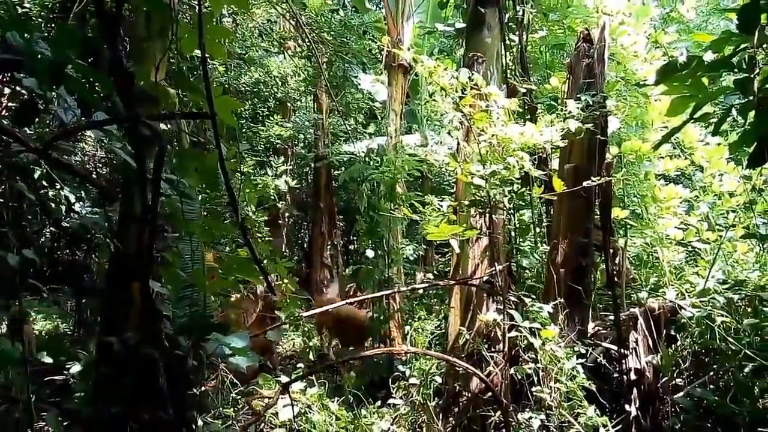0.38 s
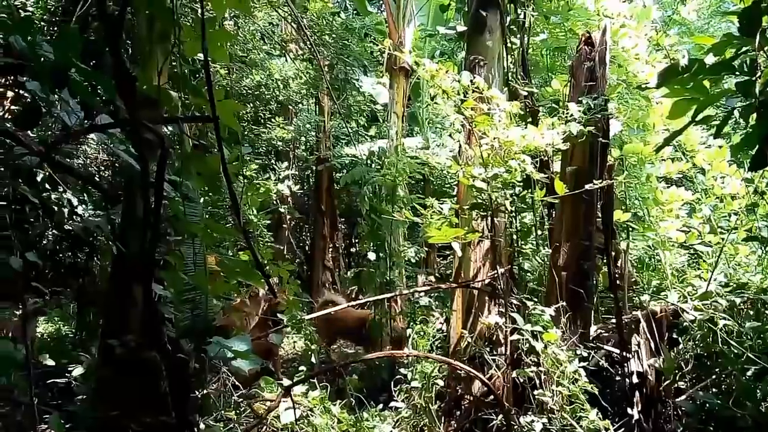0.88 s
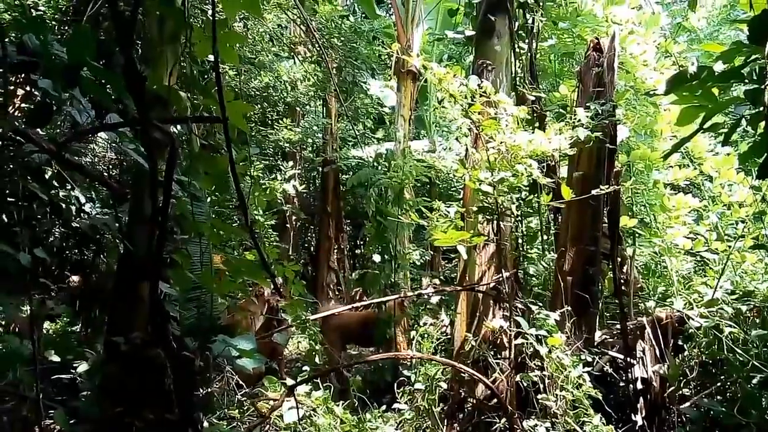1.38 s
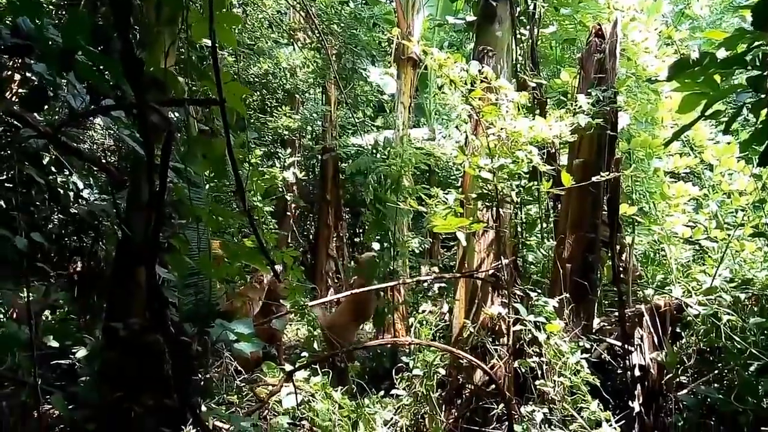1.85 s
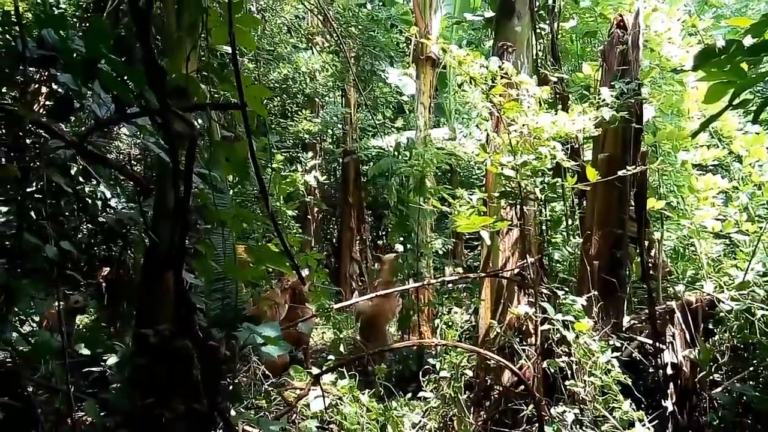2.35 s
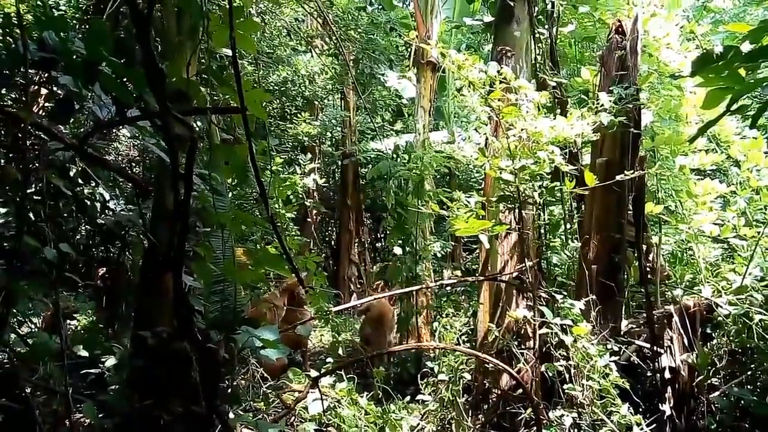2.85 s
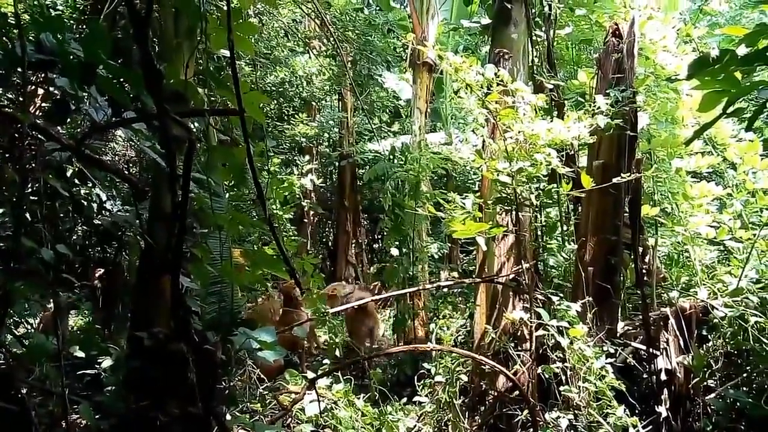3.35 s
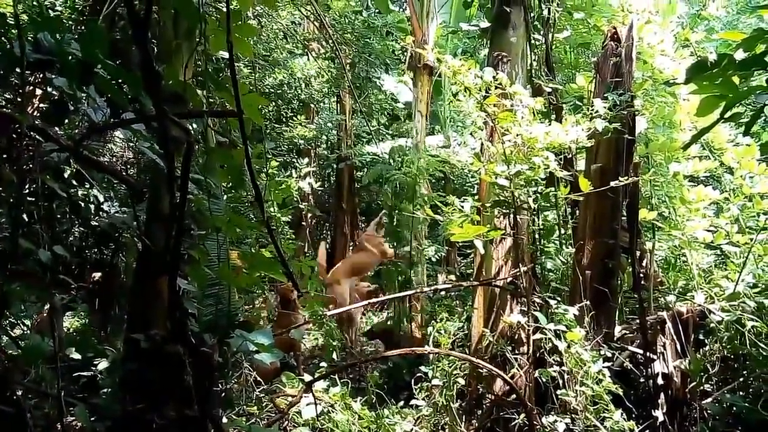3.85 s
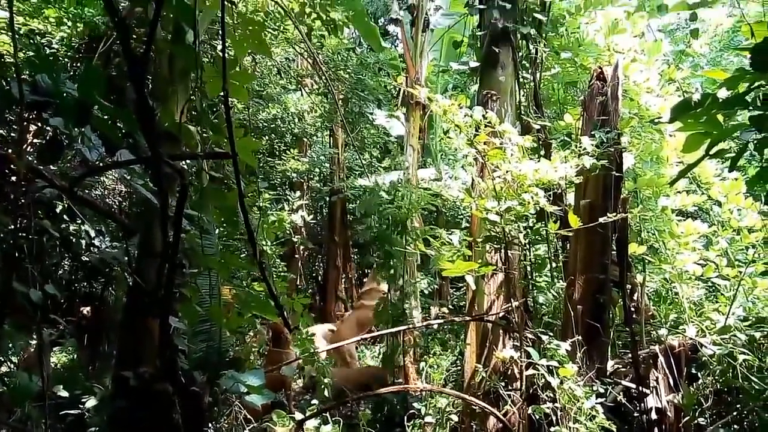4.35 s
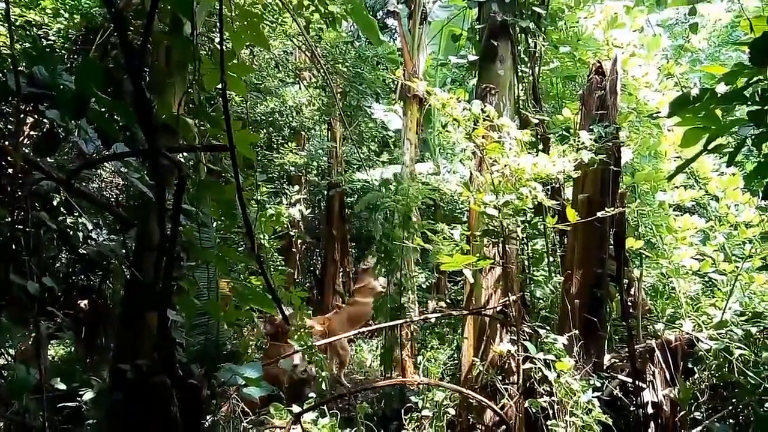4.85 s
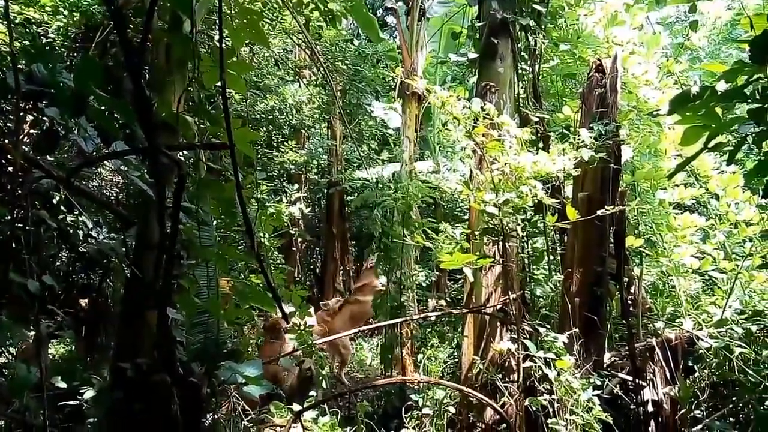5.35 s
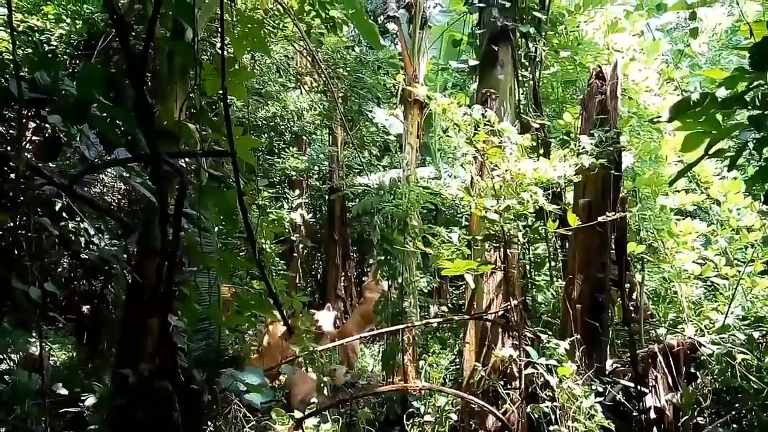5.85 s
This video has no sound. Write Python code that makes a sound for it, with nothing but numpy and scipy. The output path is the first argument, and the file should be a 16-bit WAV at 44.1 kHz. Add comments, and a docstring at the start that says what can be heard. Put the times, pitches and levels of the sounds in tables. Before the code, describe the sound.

Dogs in dense forest, some metres from a small, faintly hissing microphone, over soft leaf air and low distant traffic. From 0 to 1 s, rapid uneven panting, with the strongest puffs in the first quarter second. A small rising yip comes at 1.1, then quick yaps at 1.7 and 2.1. At 2.3 a bright yip runs into a piercing, trembling whine until about 2.75, topped by a thin nasal whistle; a loud yelp breaks upward at 2.8. Soft whimpers, whistles and pants fill 3.0 to 3.7. Three yips tumble out from 3.8 to 4.25, the middle one loudest, followed by hoarse breathy grunts around 4.4. Strong yelps hit at 4.65 and 4.9, then whimpers and a lesser yap at 5.35. A barely audible far two-tone horn lasts from 5.1 to 5.9. A last yip and whine rise at 5.6 and sag past 6.0 as paws crackle dry leaves. Calls leave short, dense trunk echoes.

```python
"""Excited dogs yip, whine and pant at the foot of a tree in thick forest, some metres from a small microphone.
Voices are trembling partials with gated breath noise; pants and the air in the leaves are filtered noise.
A thin nasal whistle rides above the whines; trunks and leaves send back a short dense echo.
Far off: traffic rumble as low noise and a two-tone horn of sines; at the end paws crackle in dry leaves."""
import sys
import numpy as np
from scipy import signal
from scipy.fft import rfft, irfft, next_fast_len
from scipy.io import wavfile
from scipy.ndimage import uniform_filter1d, minimum_filter1d, map_coordinates

SR = 44100
rng = np.random.default_rng(int(sys.argv[2]) if len(sys.argv) > 2 else 0)


def voltage_ratio(level):
    """Linear amplitude factor for a level in decibels (scalar or array-like)."""
    return 10 ** (np.asarray(level, float) / 20)


def master(y):
    """Save y as 16-bit WAV."""
    cut = np.clip(np.atleast_2d(y).T, -1, 1)
    pcm = np.round(cut * 32767)  # scale
    wavfile.write(sys.argv[1], SR, pcm.astype(np.int16))


N = 273861

# pants: start_s, breath_db, fade_s, teeth_hiss_re_breath_db
PANTS = [(0.0, -49, 0.039, -14), (0.077, -34, 0.016, -26), (0.146, -46, 0.071, -34),
         (0.204, -33, 0.015, -26), (0.398, -44, 0.041, -17), (0.492, -41.5, 0.014, -32),
         (0.622, -49.5, 0.075, -19), (0.755, -44.5, 0.022, -36), (0.911, -56.5, 0.16, -20),
         (1.01, -42.5, 0.024, -14.5), (1.287, -44.5, 0.015, -10), (1.436, -52.5, 0.035, -24),
         (1.931, -37, 0.031, -20), (3.02, -37.5, 0.048, -24), (3.278, -38, 0.014, -8),
         (3.377, -53, 0.14, -11), (3.639, -39, 0.067, -22), (3.745, -45, 0.029, -26),
         (3.9225, -41, 0.035, -13), (4.359, -34.5, 0.044, -23), (4.506, -36.5, 0.054, -28.5),
         (5.104, -47.5, 0.076, -16), (5.481, -44.5, 0.025, -23)]
# open mouth resonances: centre_hz, width_hz, relative_db
MOUTH_RESONANCES = [(1050, 170, -9), (1820, 298, 0.5), (2097, 500, -1.5), (2625, 530, -8)]
# spectrum of air in the leaves: freq_hz, relative_db
AIR_SPECTRUM = [(150, -35), (250, -6), (324, -5), (592, -2.5), (900, -6), (1310, -8), (2000, 2),
                (3140, -12.5), (3930, -14.5), (4900, -10), (6000, -17.5), (7600, -28), (9000, -57.5)]
# spectrum of far traffic: freq_hz, relative_db
RUMBLE_SPECTRUM = [(20, -20), (45, -20), (75, -6), (100, -8.5), (148, -2.5), (200, -10.5), (300, -20.5),
                   (450, -50)]
# late echo of the trunks: freq_hz, t60_s
FOREST_DECAY = [(500, 0.9), (1000, 0.46), (2200, 0.43), (3500, 0.48), (6000, 0.053)]
# swelling yips, levels before the gesture: start_s, length_s, first_pitch_hz, mid_pitch_hz, level_db
YIPS = [(1.124, 0.087, 565, 1048, -32.5), (2.318, 0.14, 892, 1258, -19), (3.771, 0.0878, 798, 916.4, -19),
        (3.96, .115, 796, 1070, -14), (4.155, .115, 693, 947.6, -22.5), (5.58, .185, 779, 1197, -17)]
# yelps that hold a note, then break upward: start_s, length_s, first_pitch_hz, mid_pitch_hz, level_db
YELPS = [(2.79, .12, 910.4, 1188, -11), (4.87, .125, 964.7, 1217, -10.5)]
# abrupt yaps: start_s, length_s, first_pitch_hz, mid_pitch_hz, level_db
YAPS = [(1.706, 0.067, 1117, 1182, -25), (1.89, 0.087, 1128, 937, -42.5), (2.097, 0.089, 1010, 1097, -21.5),
        (4.644, 0.12, 877.4, 1212, -11.5), (5.357, 0.096, 897, 1058, -24.5)]
# overtone gain of the throat, jaws wide: freq_hz, gain_db
OPEN_THROAT = [(1100, -17), (1400, -18), (1750, 0.5), (2200, -2), (2650, -9), (3000, -18), (3600, -34),
               (4100, -62.5), (4700, -36.5), (5300, -35), (6000, -46.5), (7000, -72.5), (9000, -77)]
# overtone gain of the throat, jaws nearly shut: freq_hz, gain_db
NARROW_THROAT = [(1100, 9.5), (1500, -0.2), (2300, 3.5), (3000, -4), (3400, -19), (4100, -32), (4700, -7),
                 (6500, -30), (9000, -35.5)]
# nasal whistle, one table per call: time_s, pitch_hz, level_db
WHISTLES = [
    [(1.18, 5857, -46), (1.2, 4670, -52), (1.21, 4480, -41.5), (1.225, 5140, -42)],
    [(2.34, 5760, -60), (2.42, 6490, -44.5), (2.55, 6480, -57), (2.68, 6070, -60.5), (2.73, 5310, -40.0),
     (2.77, 5500, -83)],
    [(3.11, 5620, -59), (3.19, 5930, -46.5), (3.26, 5840, -52), (3.28, 5530, -45.5), (3.3, 5240, -43)],
    [(3.42, 5840, -63), (3.46, 5970, -56)],
    [(3.49, 6330, -52), (3.53, 5660, -53.5), (3.6, 5850, -50.5), (3.635, 5740, -55)],
    [(3.642, 5306, -30.5), (3.68, 5194, -46)],
    [(5.845, 5210, -46), (5.93, 5460, -63)],
]
# long whines, one table per call: time_s, pitch_hz, fundamental_db, mouth_opening_overtone_db
WHINES = [
    [(2.41, 1186, -37, 16), (2.43, 1362, -15, -19.5), (2.47, 1469, -14.5, -14.5), (2.54, 1565, -13, -25.5),
     (2.6, 1509, -9, -22.5), (2.63, 1524, -16, -6.5), (2.66, 1500, -11.5, -24.5), (2.695, 1412, -20, -30.5),
     (2.72, 1462, -40.5, -3), (2.77, 1410, -30, -27)],
    [(4.62, 754, -37, -3.5), (4.65, 707, -45.5, 25), (4.68, 811, -25.5, 7), (4.71, 826, -32.5, 7),
     (4.75, 727.4, -39, 13.5), (4.83, 714, -51, 18), (4.87, 608, -35.5, -38)],
    [(5.61, 796, -38.5, -17), (5.65, 856.6, -24.5, -11), (5.71, 904.7, -20.5, -5), (5.74, 985, -5.5, -32.5),
     (5.76, 1098, -10, -43.5), (5.82, 1098, -9.5, -16.5), (5.86, 1035, -10, -36), (5.9, 964, -10, -18),
     (5.94, 936, -25, -5.5), (6.0, 789.6, -29, -0.5), (6.04, 672, -44.5, 2), (6.12, 587, -44.5, 5),
     (6.21, 566.4, -42.5, 2)],
]
# soft whimpers: start_s, length_s, first_pitch_hz, mid_pitch_hz, level_db
WHIMPERS = [(2.56, 0.14, 770, 800, -51), (3.205, 0.07, 1370, 1410, -33), (3.38, 0.029, 1730, 1744, -46),
            (3.461, .052, 1408, 1473, -26), (5.08, 0.086, 757, 832, -39.5), (5.15, 0.084, 967, 927, -33)]
# hoarse grunts: start_s, length_s, first_pitch_hz, mid_pitch_hz, level_db
GRUNTS = [(3.0, 0.093, 690, 642, -44.5), (3.64, 0.022, 760, 742, -36.5), (4.345, 0.062, 680, 837, -41.5),
          (4.497, 0.072, 700, 846, -39.5)]
# far horn: pitch_hz, level_db
HORN = [(328, -63), (409, -62), (657, -70)]
# horn swell: time_s, gain_db
HORN_SWELL = [(5.07, -20), (5.13, 0), (5.5, 0), (5.75, -3), (5.9, -20)]
# paws shuffling in leaves: time_s, level_db
SHUFFLE = [(5.82, -65.5), (5.85, -46), (6.0, -39), (6.21, -41)]
# dry leaves snapping, onset before colouring: start_s, onset_db
SNAPS = [(5.8608, -24.5), (5.963, -43), (6.063, -41.5), (6.1499, -42)]
# spectrum of shuffled leaves: freq_hz, relative_db
LEAF_SPECTRUM = [(150, -66), (500, -0.5), (2500, 2), (3700, -15), (5000, -5), (6000, -22.5), (8000, -38),
                 (13000, -50)]
# colour of a snap: freq_hz, gain_db
SNAP_SPECTRUM = [(500, -8), (2500, -2.5), (5000, 6), (6500, -11), (8000, -8), (10000, -26), (14000, -25.5)]


def unit(x):
    """x at rms 1."""
    return x / np.sqrt(np.mean(x ** 2) + 1e-20)


def noise():
    """White noise of rms 1, scene length."""
    return rng.standard_normal(N)


def along(points, hz):
    """(freq_hz, value) points read on a log frequency axis."""
    f, v = np.transpose(points)
    return np.interp(np.log(hz + 1), np.log(f + 1), v)


def curve(rows):
    """A (time_s, level_db) curve as gain per sample."""
    s, db = np.transpose(rows)
    return voltage_ratio(np.interp(np.arange(N) / SR, s, db, left=-150, right=db[-1]))


def wobble(rate_hz):
    """Smooth curve through random knots of variance 1, rate_hz knots a second."""
    knots = rng.standard_normal(int(N * rate_hz / SR) + 4)
    return map_coordinates(knots, [np.arange(N) * rate_hz / SR])


def filtered(x, response):
    """x through a response of frequency."""
    m = next_fast_len(N + SR // 2)
    return irfft(rfft(x, m) * response(np.fft.rfftfreq(m, 1 / SR)), m)[:N]


def coloured(x, points):
    """x through a (freq_hz, gain_db) curve."""
    return filtered(x, lambda hz: voltage_ratio(along(points, hz)))


def patchy(x, depth_db, size):
    """x with random patches of gain, size (bins, frames) of a 256-point short-time spectrum."""
    z = signal.stft(x, nperseg=256)[2]
    field = rng.standard_normal(z.shape)
    field = uniform_filter1d(field, size[0], axis=0)
    field = uniform_filter1d(field, size[1], axis=1)
    return signal.istft(z * voltage_ratio(depth_db * unit(field)), nperseg=256)[1][:N]


def mouth(f):
    """Resonances of the open mouth, in alternating sign; breath is dark above 4170 Hz."""
    peaks = 0
    for k, (centre, width, db) in enumerate(MOUTH_RESONANCES):
        band = 1j * f * width / (centre ** 2 - f ** 2 + 1j * f * width)
        peaks = peaks + (-1) ** k * voltage_ratio(db) * band
    return peaks / (1 + (f / 4170) ** 6)


def arch(rows, sag, bend, swell_to, onset_db, fade_db, open_db, brighten):
    """Short calls: pitch glides up or down to a middle pitch, then sags; level is shaped; louder is brighter."""
    mid_at, fade_from = 0.6, 0.64  # shares of the call
    u = np.linspace(0, 1, num=13)
    glide = np.sin(np.pi / 2 * np.clip(u / mid_at, 0, 1)) ** bend
    late = np.clip((u - mid_at) / (1 - mid_at), 0, 1)
    swell_db = onset_db * np.clip(1 - u / swell_to, 0, 1)
    swell_db += fade_db * np.clip((u - fade_from) / (1 - fade_from), 0, 1)
    calls = []
    for s, length_s, first_hz, mid_hz, db in rows:
        opening_db = open_db + brighten * (db + swell_db / 2 + 16.5)  # open_db holds at -16.5 dB
        hz = (first_hz + (mid_hz - first_hz) * glide) * (1 - sag * late ** 2)
        fundamental_db = db + swell_db - np.maximum(opening_db, 0)
        calls.append(np.transpose([s + length_s * u, hz, fundamental_db, opening_db]))
    return calls


def voice(calls, throat, jitter, shimmer_db, breath_db, tilt_db=0., count=7):
    """Vocal folds: partials on one trembling pitch, coloured by the throat, plus breath gated once a cycle."""
    tone, air = np.zeros(N), np.zeros(N)
    tremble = 1 + jitter * wobble(120)
    shimmers = [voltage_ratio(shimmer_db * wobble(90)) for _ in range(count)]  # one per partial
    for rows in calls:
        s, *cols = np.transpose(rows)
        at = np.arange(round(s[0] * SR), min(round(s[-1] * SR), N))
        t = at / SR
        hz, db, *opening_db = [np.interp(t, s, c) for c in cols]
        hz = uniform_filter1d(hz, size=220) * tremble[at]
        levels_db = [db]
        for k in range(1, count):
            levels_db.append(db + opening_db[0] + tilt_db * k + along(throat, (k + 1) * hz))
        phase = 2 * np.pi * np.cumsum(hz) / SR
        edge = np.clip(np.minimum(t - t[0], t[-1] - t) / .004, 0, 1)
        for k, level_db in enumerate(levels_db):
            partial = np.sqrt(2) * voltage_ratio(level_db) * np.sin((k + 1) * phase)
            tone[at] += edge * shimmers[k][at] * partial
        effort = np.sqrt(np.sum(voltage_ratio(levels_db) ** 2, axis=0))
        air[at] += edge * effort * (1 + np.cos(phase))
    source = noise()
    breath = filtered(air * source, mouth) / np.std(filtered(source, mouth))
    return tone + voltage_ratio(breath_db) * breath


def panting():
    """Puffs of breath noise through the open mouth: a quick start, then a fade; some hiss at the teeth."""
    t, flow, hiss = np.arange(N) / SR, np.zeros(N), np.zeros(N)
    for s, db, fade_s, hiss_db in PANTS:
        u = np.clip(t - s, 0, None)
        puff = voltage_ratio(db) * (1 - np.exp(-u / .004)) * np.exp(-(u / max(fade_s, .005)) ** 2)
        flow += puff
        hiss += puff * voltage_ratio(hiss_db)
    throat = filtered(noise(), lambda f: mouth(f) * f ** 2 / (f ** 2 + 1200 ** 2))
    throat = patchy(throat, depth_db=2.5, size=(2, 14))  # moving tongue
    teeth = filtered(noise(), lambda f: np.exp(-((f - 5100) / 450) ** 2))
    flicker_db = 0.83 * wobble(38) + 1.2 * wobble(300)
    return (flow * unit(throat) + hiss * unit(teeth)) * voltage_ratio(flicker_db)


def background():
    """Steady air in the leaves and a far traffic rumble that swells: two coloured noises."""
    air = unit(coloured(noise(), AIR_SPECTRUM))
    rumble = unit(coloured(noise(), RUMBLE_SPECTRUM))
    swell_db = 1.6 * wobble(6) + wobble(1.5)
    return voltage_ratio(-53.5) * air + voltage_ratio(-58.0 + swell_db) * rumble


def forest(x, near_db):
    """Scatter off trunks, new every eighth of a second: near ones answer at once, far ones die slowly, in lumps."""
    hop, out = SR // 8, np.zeros(N + SR)
    for start in range(-hop, N, hop):
        hz, t, z = signal.stft(rng.standard_normal(SR // 2), SR, nperseg=256)
        far = voltage_ratio(-60 * t / along(FOREST_DECAY, hz)[:, None])
        near = voltage_ratio(near_db - 60 * t / .11)
        lumps = voltage_ratio(2.5 * rng.standard_normal(len(t)))
        tail = signal.istft(z * (far + near) * lumps, SR, nperseg=256)[1]
        at = np.arange(max(start, 0), min(start + 2 * hop, N))
        window = np.sin(np.pi * (at - start) / (2 * hop))
        wet = signal.fftconvolve(x[at] * window, tail / np.linalg.norm(tail))
        out[at[0]:][:len(wet)] += wet
    return np.pad(out, (200, 0))[:N]  # delay in samples


def yips():
    """Yips, yelps and yaps: short gliding calls through wide jaws."""
    calls = arch(YIPS, sag=0.15, bend=1.15, swell_to=0.25, onset_db=-17, fade_db=-24, open_db=15, brighten=0.71)
    calls += arch(YELPS, sag=.12, bend=5.1, swell_to=.3, onset_db=-17, fade_db=-19.5, open_db=14.5, brighten=.5)
    calls += arch(YAPS, sag=0.23, bend=2.5, swell_to=.13, onset_db=-24, fade_db=-15.5, open_db=13, brighten=0.58)
    return voice(calls, OPEN_THROAT, jitter=0.011, shimmer_db=3.0, breath_db=-24, tilt_db=-0.16)


def whistles(whine):
    """Nasal whistle, one partial; the whine's airflow swings it, giving sum and difference tones."""
    tone = voice(WHISTLES, None, jitter=0.0047, shimmer_db=2.0, breath_db=-64.0, count=1)
    return tone * (1 + 0.83 * whine)


def whines():
    """Long whines and soft whimpers: voiced through nearly shut jaws."""
    calls = WHINES + arch(WHIMPERS, sag=.02, bend=1.8, swell_to=0.26, onset_db=-17.5, fade_db=-3,
                          open_db=-9, brighten=.01)
    return voice(calls, NARROW_THROAT, jitter=0.0079, shimmer_db=1.3, breath_db=-32.0, tilt_db=-4.5)


def grunts():
    """Hoarse grunts: an accented onset, strong shimmer and much breath through wide jaws."""
    calls = arch(GRUNTS, sag=.05, bend=1.3, swell_to=0.05, onset_db=7, fade_db=-15, open_db=-1.0, brighten=0.019)
    return voice(calls, OPEN_THROAT, jitter=.012, shimmer_db=4.0, breath_db=-11, tilt_db=-3.4)


def horn():
    """Two far horn tones and an octave: sines unsteady in level and phase over the distance."""
    t, tones = np.arange(N) / SR, np.zeros(N)
    for hz, db in HORN:
        phase = 2 * np.pi * hz * t + 1.2 * wobble(14)
        tones += np.sqrt(2) * voltage_ratio(db + 3 * wobble(15)) * np.sin(phase)
    return tones * curve(HORN_SWELL) * (t < HORN_SWELL[-1][0])


def leaves():
    """Paws in dry leaves: grainy coloured noise with a few sharp snaps, noise bursts dying 60 dB in 7 ms."""
    grains = noise() * voltage_ratio(4. * wobble(300) + 1.5 * wobble(25))
    drive = unit(grains) * curve(SHUFFLE)
    shuffle = coloured(drive, LEAF_SPECTRUM) / np.std(coloured(noise(), LEAF_SPECTRUM))
    t, snaps = np.arange(400) / SR, np.zeros(N)
    for s, db in SNAPS:
        snaps[round(s * SR):][:len(t)] += voltage_ratio(db - 60 * t / .007) * rng.standard_normal(len(t))
    return shuffle + coloured(snaps, SNAP_SPECTRUM)


def scene():
    """Dogs and leaves in the forest echo, over horn and background."""
    whine = whines()
    facing = whine + leaves()
    turned = panting() + yips() + whistles(whine) + grunts()  # mouths facing up the trunk: more echo
    echo = forest(voltage_ratio(-15) * facing + voltage_ratio(-4.0) * turned, near_db=6.5)
    echo = patchy(echo, depth_db=2.5, size=(1, 5))  # swaying leaves break up the tails
    return (facing + turned + echo + horn() + background())[None]


def roll_off(x):
    """The treble ends steeply here."""
    return signal.sosfilt(signal.butter(12, 15490, fs=SR, output="sos"), x)


def record(dry):
    """The microphone adds its hiss; a limiter turns loud peaks down under the ceiling."""
    ceiling = 0.8
    hiss = filtered(noise(), lambda hz: (hz / 8000 + .1) ** -.3)
    x = dry + voltage_ratio(-74.0) * hiss
    need = np.minimum(1, ceiling / (np.abs(x) + 1e-9))
    gain = uniform_filter1d(minimum_filter1d(need, size=441), size=221)
    return roll_off(x * gain)


dry = scene()
out = record(dry)
master(out)
```